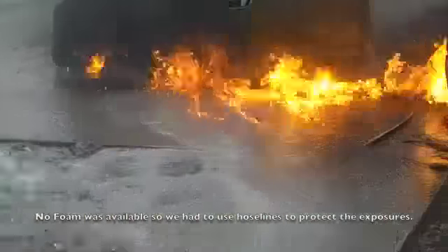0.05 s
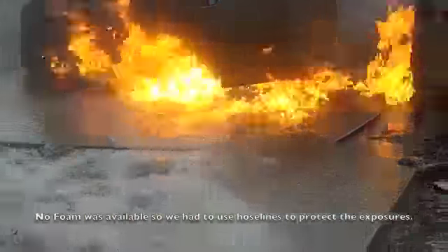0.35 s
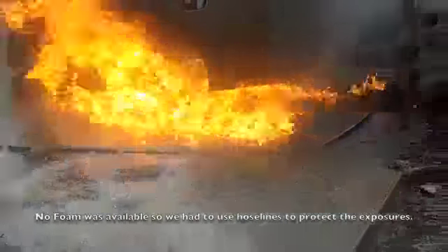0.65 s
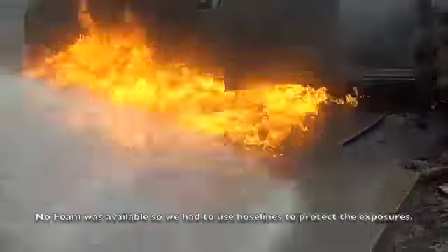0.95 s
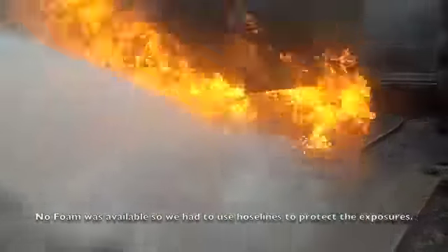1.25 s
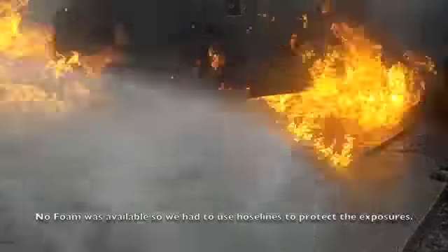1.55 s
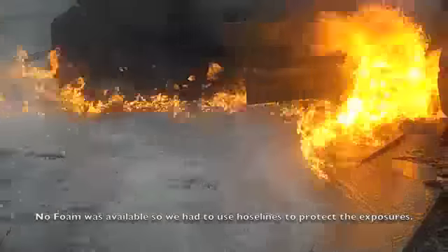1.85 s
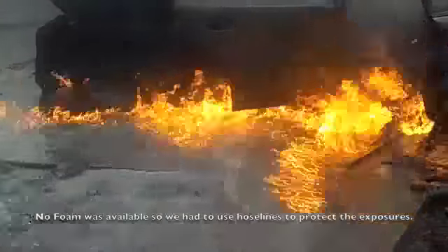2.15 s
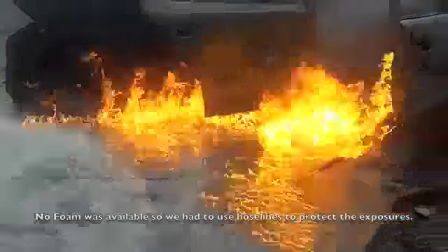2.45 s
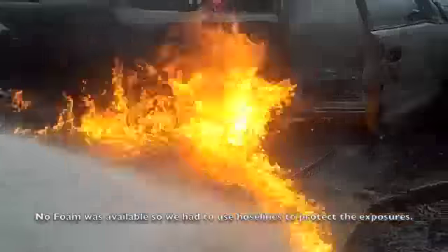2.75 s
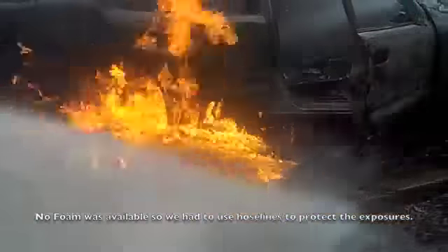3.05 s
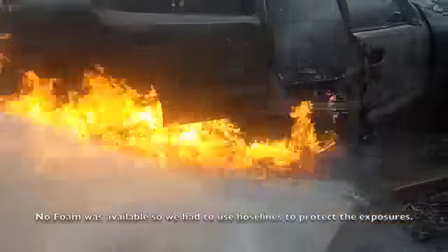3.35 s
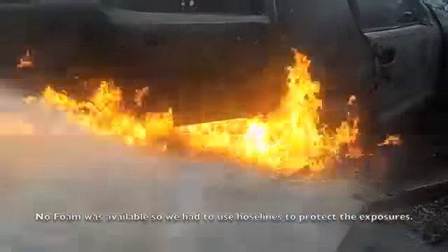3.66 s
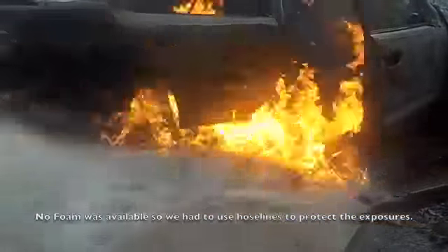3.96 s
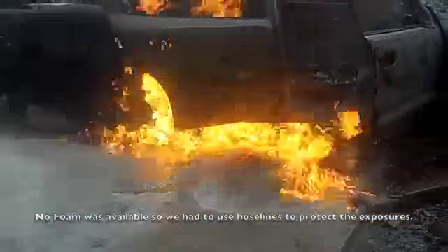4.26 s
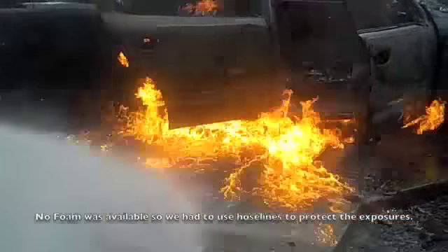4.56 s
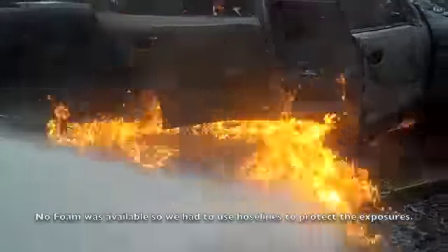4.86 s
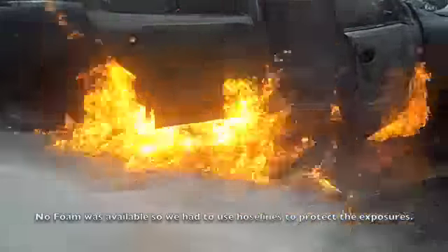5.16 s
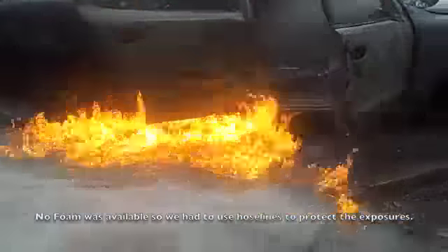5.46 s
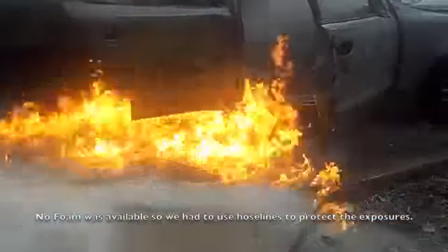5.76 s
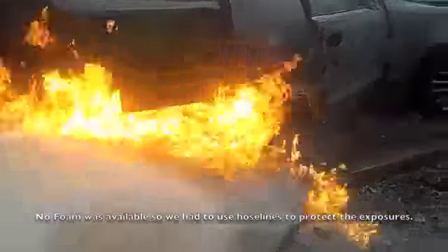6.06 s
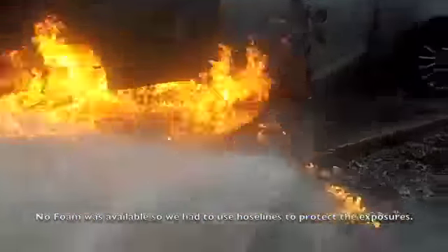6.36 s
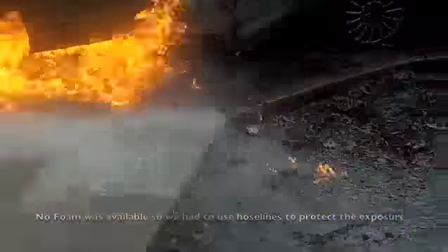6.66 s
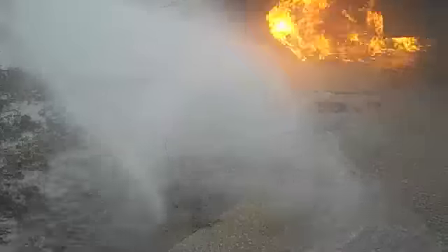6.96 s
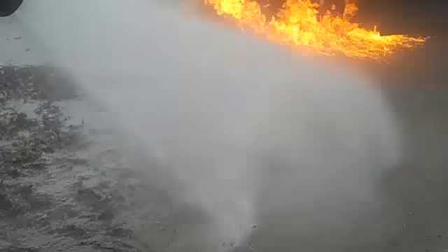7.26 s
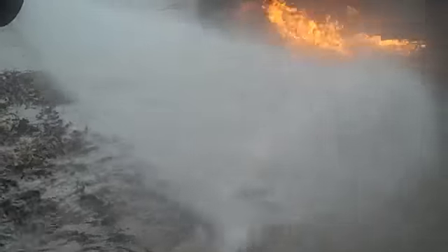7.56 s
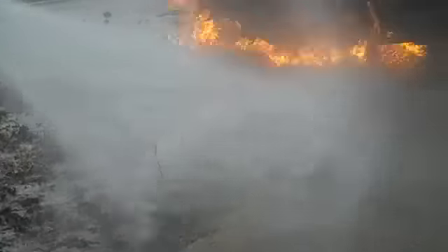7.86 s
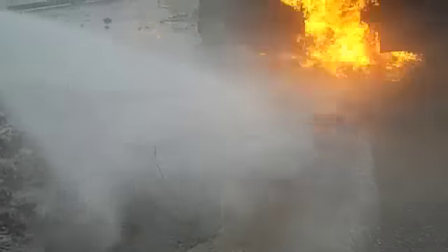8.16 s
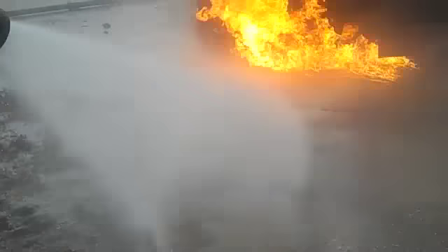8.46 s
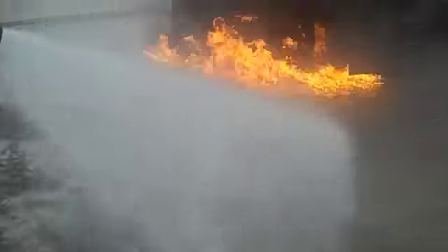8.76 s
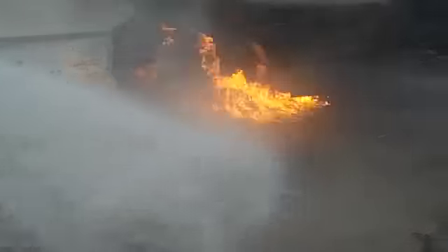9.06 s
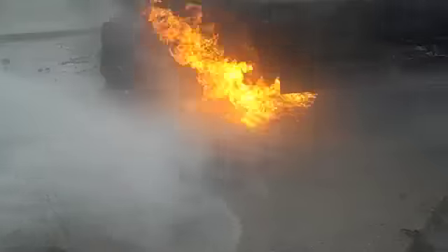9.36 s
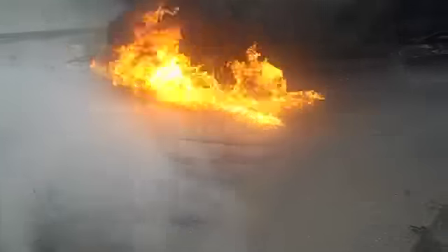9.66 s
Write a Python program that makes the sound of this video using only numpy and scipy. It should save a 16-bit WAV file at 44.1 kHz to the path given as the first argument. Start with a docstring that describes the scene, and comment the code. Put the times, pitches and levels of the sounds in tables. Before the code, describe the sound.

A fire hose sprays outdoors, close to the microphone, for about ten seconds. Its loud, bright, grainy hiss swells and eases slightly as the jet sweeps, with drops spattering on pavement and a soft wash of running water. Underneath, a burning vehicle gives a dull, uneven rumble and a pump engine drones with a low, wavering hum. Wind buffets the microphone hardest during the first second, with weaker gusts around 1.7, 2.7, 3.4 and 4.4 seconds. Wind rises again near 6.7 seconds. At about 6.9 seconds the whole sound fades out and straight back in. The spray returns a little louder and nearer, slightly to the right, with more low gusts until about 8.5 seconds. One light, hollow tap sounds close by at about 7.8 seconds. The hiss, flames and engine continue to the end.

```python
"""Fire hose on a burning vehicle

Outdoors, close to a small stereo camera, a jet of water hisses and its drops spatter on the pavement,
over the rumble of flames and a running pump engine. Gusts buffet the two microphone ports.
Near seven seconds the whole sound fades out and straight back in; one light tap follows."""
import sys
import numpy as np
from scipy import signal
from scipy.fft import rfft, irfft, next_fast_len
from scipy.io import wavfile
from scipy.ndimage import uniform_filter1d

SR = 44100
rng = np.random.default_rng(int(sys.argv[2]) if len(sys.argv) > 2 else 0)


def pcm_store(signal):
    """Save signal as 16-bit PCM."""
    levels = np.round(np.clip(np.atleast_2d(signal), -1, 1) * 32767)
    wavfile.write(sys.argv[1], SR, levels.astype(np.int16).T)


N = 427769
SIZE = next_fast_len(N)
TIME, FREQ = np.arange(N) / SR, np.fft.rfftfreq(SIZE, 1 / SR)

# the water between sweeps, nearer after the fade: (time [s], relative hiss [dB], relative splash [dB])
WATER_LEVELS = [(0, -19.5, -31), (0.8, -19, -30), (2.05, -19, -30.5), (2.7, -18, -28), (3.3, -17.5, -30.5),
                (4.4, -19, -29.5), (5.35, -17, -31), (5.8, -18, -29.5), (6.85, -20, -32), (7.03, -15, -26),
                (8.3, -15.5, -26.5), (9.7, -16.5, -27)]


def gain_of(db):
    """Decibels to amplitude."""
    return 10 ** (np.asarray(db) / 20)


def evened(x):
    """Scales to rms 1."""
    return x / np.sqrt(np.mean(x ** 2) + 1e-20)


def read(points, hz):
    """A spectrum table at the given frequencies."""
    f, value = np.transpose(points)
    return np.interp(np.log(hz + 1), np.log(f), value)


def follow(rows):
    """Each column of an envelope table at every sample."""
    times, *columns = np.vstack(rows).T
    return [np.interp(TIME, times, c) for c in columns]


def filtered(x, response):
    """Passes x through a frequency response."""
    return irfft(rfft(x, SIZE) * response, SIZE)[..., :N]


def coloured(x, spectrum):
    """Gives x the colour of a spectrum table, at rms 1."""
    return evened(filtered(x, gain_of(read(spectrum, FREQ))))


def drift(hz):
    """Random modulation of rms 1, rolling off above hz."""
    return evened(filtered(rng.standard_normal(N), (FREQ > 1) / (1 + (FREQ / hz) ** 4)))


def drops(per_s, spread_db, share):
    """Countless tiny impacts merge into noise; separate larger drops carry a share of the power."""
    size = gain_of(spread_db * np.minimum(rng.exponential(1, (2, N)), 4))
    hits = size * rng.choice([-1, 1], (2, N)) * (rng.random((2, N)) < per_s / SR)
    return np.sqrt(share) * evened(hits) + np.sqrt(1 - share) * rng.standard_normal((2, N))


def jet(swell_db, flutter):
    """The jet breaks up into a grainy hiss of drops and a fizz of fine mist."""
    # colours of the drops and of the mist: (frequency [Hz], level [dB])
    hiss_colour = [(1500, -17.5), (3500, -4), (5000, 3), (6500, 4), (8200, 1), (9500, -1.5), (12000, -6),
                   (14500, -5.5)]
    mist_colour = [(5000, -40), (8000, -2), (10000, -5), (12000, -1), (14500, 2.5)]
    # the mist against the hiss: (time [s], relative level [dB])
    mist_levels = [(0, -6.5), (2.3, -9), (2.6, -4), (5.2, -4.5), (5.7, -3), (6.8, -2), (7.05, -6),
                   (8.3, -4), (9.7, -2.5)]
    hiss_db, _ = follow(WATER_LEVELS)
    hiss = coloured(drops(per_s=5000, spread_db=6, share=0.18), hiss_colour)
    mist = coloured(rng.standard_normal((2, N)), mist_colour) * gain_of(follow(mist_levels)[0])
    return (hiss + mist) * gain_of(hiss_db + swell_db - 11 + 0.3 * flutter)


def splash(swell_db, flutter):
    """Drops spatter on the ground, swelling a little less than the jet."""
    # upper-mid spatter: (frequency [Hz], level [dB])
    colour = [(700, -20), (1400, -8), (1900, -1.5), (3000, -0.5), (4000, -1), (6000, -5.5), (12000, -36)]
    _, splash_db = follow(WATER_LEVELS)
    spatter = coloured(drops(per_s=1800, spread_db=0, share=0.22), colour)
    return spatter * gain_of(splash_db + 0.71 * swell_db - 1 + 0.37 * flutter)


def runoff():
    """Water runs over the pavement in a low wash."""
    # body of the wash: (frequency [Hz], level [dB])
    colour = [(150, -1), (330, -0.5), (480, -2.5), (630, -0.5), (850, -1), (1050, 0), (1300, -2),
              (1600, -3.5), (2500, -9.5), (6000, -19.5)]
    # its ebb and flow: (time [s], relative level [dB])
    levels = [(0, -38), (1.5, -34.5), (1.8, -37), (2.58, -34.5), (3.2, -39.5), (3.65, -37.5), (5.35, -40.5),
              (5.6, -37), (9.7, -39)]
    wash = coloured(drops(per_s=700, spread_db=2, share=0.19), colour)
    return wash * gain_of(follow(levels)[0] + 2)


def sweeps():
    """The swell in dB as the jet swings towards the microphone and away."""
    # (peak time [s], swell [dB], rise [s], ebb [s])
    swings = [(0.28, 3, 0.081, 0.22), (0.57, 2.5, 0.052, 0.063), (0.97, 4, 0.074, 0.58),
              (2.58, 3, 0.051, 0.44), (3.04, 2, 0.2, 0.24), (3.82, 2, 0.11, 0.17), (4.54, 2, 0.049, 0.1),
              (4.88, 2, 0.21, 0.29), (5.66, 1.8, 0.12, 0.24), (6.32, 3, 0.16, 0.48)]
    return sum(db * np.exp(-((TIME - s) / np.where(TIME < s, rise, ebb)) ** 2)
               for s, db, rise, ebb in swings)


def reflections(water, echo_db, longest_ms, sway, count):
    """Wet ground and vehicle panels return the spray a moment later; the paths wander as the hose swings."""
    echoes = np.zeros_like(water)
    for path_ms in np.geomspace(1, longest_ms, count):
        swing = np.interp(TIME, np.arange(11), rng.standard_normal(11))  # a new position each second
        delay_s = path_ms / 1000 * np.exp(sway * swing)
        earlier = np.maximum(np.round((TIME - delay_s) * SR), 0).astype(int)
        echoes += rng.choice([-1, 1]) * water[:, earlier]
    return water + gain_of(echo_db) * echoes / np.sqrt(count)


def spray_image(water, patchy_db, scatter_ms):
    """The jet is one moving source, the scattered drops a wide one a little to the right."""
    # where the jet points: (time [s], left minus right [dB], direct share [0-1])
    aim = [(0.6, 0.35, 0.18), (1.05, 0.2, 0.66), (1.6, 0, 0.62), (1.9, -0.2, 0.1), (2.45, 0, 0.16),
           (2.7, 0.3, 0.67), (6.8, 0.5, 0.5), (7.1, -0.7, 0), (9.7, -1, 0.48)]
    # how alike direct and scattered spray are at the two ports: (frequency [Hz], coherence [0-1])
    direct_coherence = [(200, 0.84), (7800, 0.97), (9500, 0), (14000, 0.2)]
    scatter_coherence = [(200, 0.98), (700, 0.9), (1700, 0.68), (2600, 0.59), (3400, 0.2), (5000, 0),
                         (14000, 0)]
    hz, frame_s, (left, right) = signal.stft(water, SR, nperseg=512)
    hz = hz[:, None]
    times, *columns = np.transpose(aim)
    pan_db, focus = (np.interp(frame_s, times, c) for c in columns)
    delay_ms = 0.0065 - 0.04 * pan_db  # the left port hears the jet sooner as it moves left
    phase_per_ms = -2j * np.pi * hz / 1000
    direct = np.clip(focus * read(direct_coherence, hz), 0, 1)
    scattered = (1 - direct) * np.clip(read(scatter_coherence, hz), 0, 1)
    likeness = direct * np.exp(phase_per_ms * delay_ms) + scattered * np.exp(phase_per_ms * scatter_ms)
    left = likeness * right + np.sqrt(np.maximum(1 - abs(likeness) ** 2, 0)) * left
    panned = np.array([left * gain_of(pan_db / 2), right * gain_of(-pan_db / 2)])
    # clumps of water light up changing patches of the spectrum, 4 bins by 8 frames
    patches = uniform_filter1d(rng.standard_normal(left.shape), 4, axis=0)
    patches = evened(uniform_filter1d(patches, 8, axis=1))
    return signal.istft(panned * gain_of(patchy_db * patches), nperseg=512)[1][:, :N]


def hose():
    """All the water, placed in stereo; uneven flow makes hiss and splash flutter together."""
    swell_db = sweeps() + 0.36 * drift(hz=7.5)  # the nozzle shakes in the hands
    flutter = drift(hz=34.8)
    water = jet(swell_db, flutter) + splash(swell_db, flutter) + runoff()
    water = reflections(water, echo_db=-15, longest_ms=12, sway=0.14, count=10)
    return spray_image(water, patchy_db=0.83, scatter_ms=0.03)


def fire():
    """Flames billow with a dull, lumpy roar, the same at both ports."""
    # bass-heavy roar: (frequency [Hz], level [dB])
    colour = [(20, -1), (60, -1.5), (100, 1.5), (135, 0), (180, -3.5), (240, -4), (320, -11), (450, -17),
              (900, -37), (3000, -72)]
    # surges of the flames: (time [s], relative level [dB])
    surges = [(1.25, -40), (1.66, -32.5), (1.95, -36.5), (2.6, -36.5), (2.95, -42.5), (3.7, -34),
              (4.4, -43), (4.87, -36), (5.3, -41), (8.5, -37.5), (9.2, -40)]
    roar = coloured(rng.standard_normal(N), colour)
    return roar * gain_of(follow(surges)[0] + 5.5 + 2 * drift(hz=24.3))


def pump_engine():
    """The pump engine drones, wavering in speed and strength, with a faint whine above."""
    # the engine's strength: (time [s], relative drone [dB], relative whine [dB])
    levels = [(0, -46, -60), (1.7, -35.5, -62), (2.6, -35, -66), (3.05, -41.5, -67), (4.3, -38, -54),
              (5.3, -41, -53), (6.3, -36.5, -65), (7.1, -34, -64), (8.1, -38.5, -68), (8.8, -33, -53),
              (9.7, -36.5, -63)]
    # tones of the drone: (frequency [Hz], relative level [dB])
    tones = [(111.5, 0.5), (73, -23), (188.2, -15.5)]
    drone_db, whine_db = follow(levels)
    waver = drift(hz=13.4)
    engine_time = np.cumsum(1 + 0.029 * waver) / SR
    drone = sum(gain_of(db + 2.2 * drift(hz=7)) * np.sin(2 * np.pi * hz * engine_time)
                for hz, db in tones)
    whine_hz = 765 * (1 + 0.006 * waver)
    whine = np.sin(2 * np.pi * np.cumsum(whine_hz) / SR)
    return np.sqrt(2) * (gain_of(drone_db + 0.2) * drone + gain_of(whine_db + 1.5) * whine)


def wind():
    """Eddies hit each port separately; gusts swell out of the breeze, sudden ones reaching higher."""
    # rumble of air on the microphone: (frequency [Hz], level [dB])
    colour = [(8, -18), (25, 0), (45, 1), (80, -1.5), (140, -2), (250, -15.5), (500, -33), (2000, -70)]
    # the bed of breeze: (time [s], relative level [dB])
    breeze = [(0, -32), (1.4, -33.5), (2, -43), (2.7, -39), (3.1, -44), (4.5, -43), (6.3, -48), (7.1, -33),
              (8.6, -34), (9.7, -50)]
    # gusts and buffets: (peak time [s], relative level [dB], half-length [s], upper edge [Hz])
    gusts = [(0.115, -15, 0.09, 216), (0.163, -26, 0.017, 362.4), (0.37, -19, 0.095, 150),
             (0.533, -24, 0.036, 520), (0.576, -20, 0.22, 175), (0.622, -17.5, 0.012, 480),
             (0.767, -20, 0.12, 110), (1.01, -18.5, 0.073, 170), (1.019, -14, 0.016, 260),
             (1.677, -24, 0.061, 130), (2.674, -26, 0.018, 500), (3.42, -24.5, 0.11, 115),
             (4.43, -23.5, 0.08, 130), (6.706, -25, 0.2, 139), (7.03, -20.5, 0.16, 193),
             (7.24, -24, 0.14, 110), (7.5, -23.5, 0.067, 110), (8.3, -26, 0.047, 80),
             (8.5, -22.5, 0.096, 95)]
    air = coloured(rng.standard_normal((2, N)), colour)
    air *= gain_of(follow(breeze)[0] + 2.2 * drift(hz=14))
    for s, db, half_s, edge_hz in gusts:
        eddy = evened(filtered(rng.standard_normal((2, N)), 1 / (1 + (FREQ / edge_hz) ** 3)))
        air += gain_of(db) * eddy * np.exp(-2 * ((TIME - s) / half_s) ** 2)
    return air * gain_of([[-0.5], [0.8]])  # a little stronger on the right


def tap(at_s, db, hz, decay_s):
    """One light, hollow tap close by."""
    knock = evened(filtered(rng.standard_normal(N), (FREQ / hz) / (1 + (FREQ / hz) ** 5)))
    since = TIME - at_s
    return gain_of(db) * knock * (since > 0) * np.exp(-abs(since) / decay_s)


def scene():
    """Water, fire, engine, moving air and one tap."""
    return hose() + fire() + pump_engine() + wind() + tap(at_s=7.842, db=-21, hz=730, decay_s=0.0065)


def record(dry):
    """Each port rings at its own pitch and loses bass; then the brief fade, soft clip and band limit."""
    # port cavities, left then right: (resonance [Hz], width [Hz], tilt above [dB/octave], bass cut [Hz])
    ports = [(8276, 900, 16, 57), (6890, 1610, -3, 12)]
    # the quick fade out and back in: (time [s], gain [0-1])
    fade = [(6.84, 1), (6.9, 0.45), (6.944, 0.0067), (6.975, 0.29), (7.04, 0.92)]
    responses = []
    for hz, width, tilt_db, cut_hz in ports:
        cavity = 1 / (1 - (FREQ / hz) ** 2 + 1j * FREQ * width / hz ** 2)
        treble = gain_of(tilt_db * np.log2(np.maximum(FREQ / hz, 1)))
        bass = 1j * FREQ / (1j * FREQ + cut_hz)
        responses.append(cavity * treble * bass)
    heard = filtered(dry, np.array(responses)) * follow(fade)[0]
    heard = heard / (1 + (heard / 0.88) ** 8) ** (1 / 8)  # rounds off the highest peaks
    low_pass = signal.firwin(801, cutoff=14230, window=("kaiser", 9), fs=SR)
    return signal.oaconvolve(heard, low_pass[None], "same")


dry = scene()
out = record(dry)
pcm_store(out)
```